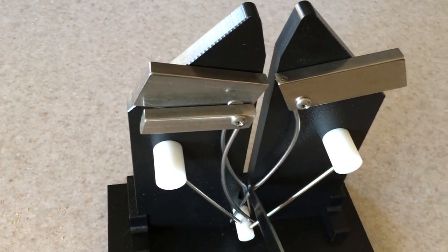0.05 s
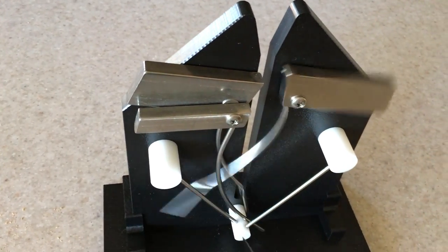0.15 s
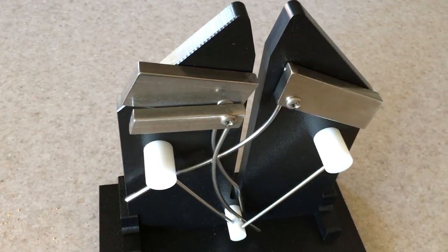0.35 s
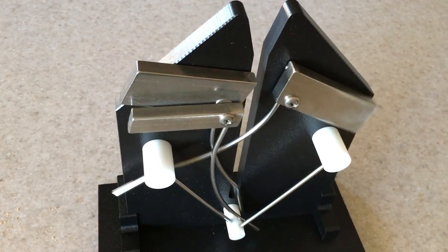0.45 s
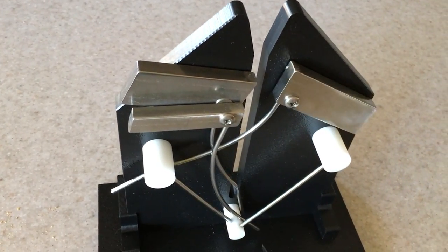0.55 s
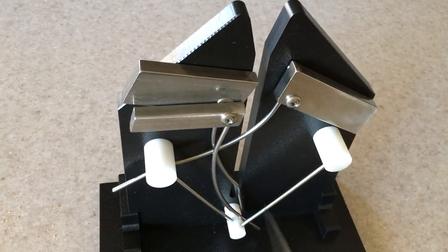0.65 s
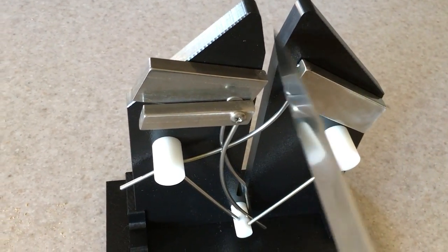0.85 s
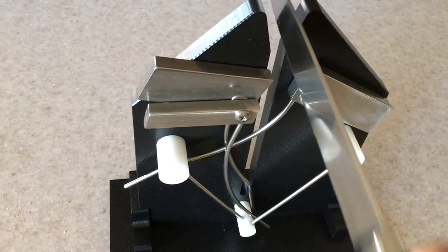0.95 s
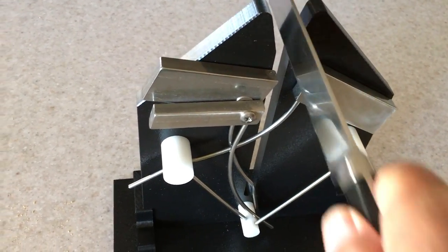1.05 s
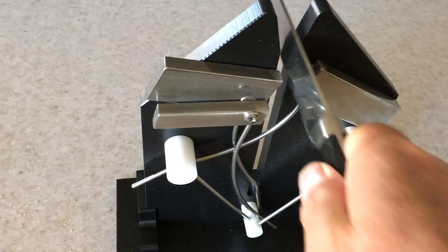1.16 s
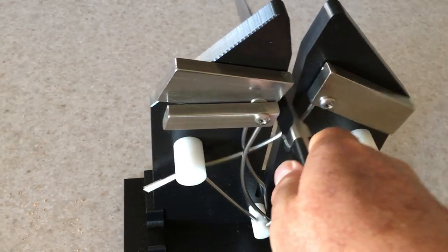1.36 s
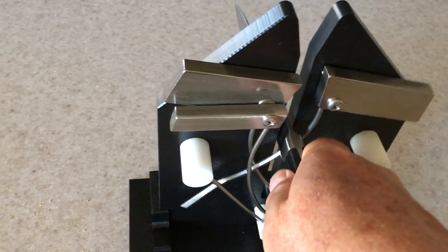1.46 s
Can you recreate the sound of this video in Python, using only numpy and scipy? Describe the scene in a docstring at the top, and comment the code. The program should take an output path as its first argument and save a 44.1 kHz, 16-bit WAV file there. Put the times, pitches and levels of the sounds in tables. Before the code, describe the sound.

Sharp metallic clacks bounce to rest on a spring-loaded knife sharpener, followed by a light clink.

```python
"""Knife in a spring-loaded sharpener

A knife scrapes out of a steel sharpener on a kitchen counter. The freed arm swings back, clacks
against its stop and bounces to rest; its wire spring rings and the plastic base thuds. Then the
blade taps in again. It is heard from close by, in a small, echoing room with a low rumble."""
import sys
import numpy as np
from scipy import signal
from scipy.fft import rfft, irfft
from scipy.io import wavfile
from scipy.ndimage import uniform_filter1d

SR = 44100
rng = np.random.default_rng(int(sys.argv[2]) if len(sys.argv) > 2 else 0)


def to_wav(s):
    """Save 16-bit WAV."""
    ch = np.atleast_2d(s).T  # columns
    pcm = np.round(np.clip(ch, -1, 1) * 32767)  # PCM
    wavfile.write(sys.argv[1], SR, pcm.astype(np.int16))


N = 66150

# each hit of the arm on its stop (time [s], level [dB], contact length [s], rise [s],
# brightness [dB per octave], base knock [dB], base thud [dB], spring ring [dB])
ARM_HITS = [(0.2037, -6, 0.0055, .0003, 2, -11.5, -12.5, -3),
            (0.2288, -19, 0.011, .001, -3, -13.5, -35, -4.5), (0.296, -0.5, 0.0039, .0002, 2, 2.5, 4, -0.5),
            (0.306, -16, 0.023, .001, 3, -2, -17.5, -23), (0.327, -14, 0.0083, .001, -2.5, -12, -16.5, -23),
            (0.339, -25, 0.0062, .001, -4, -17.5, -35.5, -29.5),
            (0.4272, -1, 0.003, .0008, 3, -2.5, -3, -0.5),
            (0.4613, -14.5, 0.0023, .0003, -0.5, -8.5, -33, -21.5),
            (0.5104, -8.5, 0.0031, .002, 1.5, -13, -9.5, 1), (0.524, -9.5, 0.0026, .002, -5, -8, -10, -4),
            (0.5761, -13, 0.0048, .0035, -3, -13, -14.5, -23),
            (0.623, -12, 0.0086, .004, -2, -13, -16.5, -20),
            (0.639, -23.5, 0.0018, .002, -7, -16.5, -16.5, -21),
            (0.659, -21, 0.018, .004, -5.5, -18, -13.5, -11),
            (0.686, -31.5, 0.034, .004, -7.5, -17, -14.5, -42)]
# tone of struck steel (frequency [Hz], level [dB])
STEEL_TONE = [(300, -23), (800, -11.5), (1500, -1), (2300, 0), (3000, -6.5), (4200, -3.5), (5600, -4.5),
              (9000, -12), (11300, -16.5), (13500, -12.5), (17500, -26)]

CRACK_DB, CRACK_T60_S = -9, 0.025  # sharp crack of steel; a "t60" is the time to fade by 60 dB
GRIT_S, GRIT_DB = 0.0028, 3.5  # fast flicker that makes a rattle rough


def undb(db):
    """Turn decibels into a gain to multiply by."""
    return 10 ** (np.asarray(db) / 20)


def unit(x):
    """Scale a signal to an average (rms) strength of 1."""
    return x / np.sqrt(np.mean(x ** 2))


def along(points, hz):
    """Read between (Hz, value) points, with octaves evenly spaced."""
    p = np.array(points)
    return np.interp(np.log(hz + 1), np.log(p[:, 0]), p[:, 1])


def noise(tone, tilt_db=0, peaks=()):
    """Noise of a given tone, tilted per octave around 3 kHz and boosted at any (Hz, dB) peaks."""
    hz = np.fft.rfftfreq(N, 1 / SR)
    octaves = np.log2(np.maximum(hz, 500) / 3000)
    boost = 1 + sum(undb(db + 4) / (1 + ((hz - peak_hz) / 38) ** 2) for peak_hz, db in peaks)
    gain = undb(along(tone, hz) + tilt_db * octaves)
    return unit(irfft(rfft(rng.standard_normal(N)) * boost * gain, N))


def resonance(hz, width):
    """A narrow band of noise around one pitch."""
    f = np.fft.rfftfreq(N, 1 / SR)
    return unit(irfft(rfft(rng.standard_normal(N)) / (1 + ((f - hz) / width) ** 2), N))


def since(start):
    """Seconds since the start, zero before it."""
    return np.maximum(np.arange(N) / SR - start, 0)


def burst(start, hold, t60, rise=0.00013):
    """Loudness shape: rise quickly, hold, fade away (all times in seconds)."""
    t = since(start)
    return (1 - np.exp(-t / rise)) * np.exp(-np.log(1000) * np.maximum(t - hold, 0) / t60)


def flutter(span, depth_db):
    """A gain that moves to a new random value every span seconds."""
    times = np.arange(0, N / SR + span, span)
    values = rng.standard_normal(N)[:len(times)]
    return unit(undb(depth_db * np.interp(np.arange(N) / SR, times, values)))


def ring(notes, start, scatter_db=0):
    """A struck object's notes swell and die away; scatter varies their strength and phase."""
    t, out = since(start), np.zeros(N)
    live = (t > 0) & (t < 1)
    t = t[live]
    rise_cycles = 2.7
    for (hz, db, t60), (size, turn) in zip(notes, rng.standard_normal((len(notes), 2))):
        shape = (1 - np.exp(-t * hz / rise_cycles)) * np.exp(-np.log(1000) * t / t60)
        wave = np.sin(2 * np.pi * hz * t + 2 * scatter_db * turn)
        out[live] += undb(db + scatter_db * size) * shape * wave
    return out


def rumble():
    """The room's steady low rumble."""
    # tone of the rumble (frequency [Hz], level [dB])
    rumble_tone = [(25, -32.5), (38, -23.5), (55, 0), (85, -19.5), (118, -12.5), (160, -19.5), (330, -27.5),
                   (1500, -40), (4000, -54), (17000, -61.5)]
    return noise(rumble_tone)


def room(x):
    """The kitchen's echoes blur into a tail that lasts longest at middle pitches."""
    # tone of the echo (frequency [Hz], level [dB])
    echo_tone = [(60, -8.5), (300, 4), (1500, 2), (4000, -9), (8000, -3), (16000, -1)]
    # how long the echo lasts (frequency [Hz], t60 [s])
    echo_t60 = [(100, 0.42), (1800, 0.79), (4000, 0.78), (16000, 0.32)]
    hz, t = np.fft.rfftfreq(N, 1 / SR), since(0.0095)
    spectrum = rfft(rng.standard_normal(N)) * undb(along(echo_tone, hz))
    bands = np.round(2 * np.log2(np.maximum(hz, 50)))  # half an octave each
    tail = np.zeros(N)
    for band in np.unique(bands):
        fade = np.exp(-np.log(1000) * t / along(echo_t60, 2 ** (band / 2)))
        tail += irfft(spectrum * (bands == band), N) * fade
    tail *= 1 - np.exp(-t / 0.00067)
    return signal.fftconvolve(x, tail / np.sqrt(np.sum(tail ** 2)))[:N]


def squeaks():
    """Steel sticks and slips on steel, making short, falling tones."""
    # the leaving blade, then the swinging arm
    # (time [s], length [s], start pitch [Hz], end pitch [Hz], level [dB])
    slips = [(.005, 0.056, 545, 522, -39.5), (0.319, 0.038, 590, 567, -24.5)]
    out = np.zeros(N)
    for start, length, from_hz, to_hz, db in slips:
        progress = np.clip(since(start) / length, 0, 1)
        hz = from_hz + (to_hz - from_hz) * progress
        wave = np.sin(2 * np.pi * np.cumsum(hz) / SR)
        out += undb(db) * np.sin(np.pi * progress) * wave * flutter(span=0.0074, depth_db=2.27)
    return out


def scrape():
    """The knife's edge drags unevenly over the steel and slips free."""
    # notes of the sliding blade (pitch [Hz], width [Hz], level [dB])
    sliding_notes = [(1380, 35, 0), (1560, 80, -4), (6900, 200, -7.5)]
    # tone of the rubbing (frequency [Hz], level [dB])
    rub_tone = [(100, -7), (450, -8.5), (2500, -18.5), (11000, -32.5), (17000, -39)]
    grip = undb(2.2 * unit(uniform_filter1d(rng.standard_normal(N), size=300)))
    singing = unit(sum(undb(db) * resonance(hz, width) for hz, width, db in sliding_notes))
    fade = np.clip((0.25 - since(0)) / 0.32, 0, 1)  # silent from 0.25 s on
    return (undb(-43.5) * singing + undb(-38.5) * noise(rub_tone)) * grip * fade


def snags():
    """The edge catches crisply on its way out, and each catch bumps the hollow plastic."""
    # catches of the edge (time [s], level [dB])
    catches = [(.154, -21), (.168, -26), (.191, -26)]
    clicks = sum(undb(db) * burst(start, hold=0, t60=0.07) for start, db in catches)
    bumps = sum(undb(db) * burst(start, hold=0, t60=0.26) for start, db in catches)
    return undb(CRACK_DB) * clicks * noise(STEEL_TONE) + undb(-10) * bumps * resonance(hz=187, width=61)


def base(start, knock_db, thud_db):
    """The plastic base knocks and rocks on the counter."""
    # tone of knocked plastic (frequency [Hz], level [dB])
    plastic_tone = [(36, -38), (70, 9.5), (130, 1), (190, -5), (290, -1), (430, -10.5), (1500, -10),
                    (4000, -32)]
    # low notes of the rocking base (pitch [Hz], level [dB], t60 [s])
    base_notes = [(70, -1, 0.33), (93.1, -5, 0.18), (125, -2.5, 0.085), (312, -24.5, 0.5)]
    knock = noise(plastic_tone) * burst(start, hold=0, t60=0.13, rise=0.00153)
    return undb(knock_db - 16) * knock + undb(thud_db - 8) * ring(base_notes, start)


def blade():
    """The blade goes back into the slot: it clinks, chatters and knocks the hollow plastic."""
    # taps of the blade (time [s], crack level [dB], base knock and thud [dB])
    taps = [(1.4421, -0.5, -16), (1.4455, -15.5, -14.5), (1.495, -7, -22)]
    # notes of the blade (pitch [Hz], level [dB], t60 [s])
    blade_notes = [(1508, -23.5, 0.1), (1750, -33, .12), (2380, -35, 0.08), (3310, -40, 0.2),
                   (5150, -40, 0.14), (6495, -33, .1), (8250, -34, 0.08), (11600, -41, 0.12),
                   (13500, -41, .14), (15420, -39, .11)]
    # note of the hollow slot (pitch [Hz], level [dB], t60 [s])
    slot_notes = [(265, -16.5, 0.065)]
    out = ring(blade_notes, start=taps[0][0]) + ring(slot_notes, start=taps[1][0])
    peaks = [(hz, 0) for hz, _, _ in blade_notes]
    for start, db, base_db in taps:
        crack = burst(start, hold=0.0034, t60=CRACK_T60_S)
        rattle = undb(-13) * burst(start, hold=0, t60=0.42)
        out += undb(db - 34.5) * (crack + rattle) * noise(STEEL_TONE, tilt_db=2, peaks=peaks)
        out += base(start, base_db, base_db)
    return out


def wire_ticks():
    """The spring wire ticks against its neighbour as it settles."""
    # light ticks (time [s], level [dB])
    ticks = [(0.542, -1), (0.5998, -8), (0.6153, 0), (0.652, -5.5), (0.676, -5.5), (1.446, 1)]
    shape = sum(undb(db - 29) * burst(start, hold=0.00037, t60=0.025) for start, db in ticks)
    return shape * resonance(hz=8480, width=380)


def spring():
    """The arm's hits shake the spring into a short, rough jingle; bright hits add a high shimmer."""
    # notes of the spring wire (pitch [Hz], level [dB], width [Hz])
    jingle_notes = [(7465, -9, 20), (8338, 0, 55), (9690, -10, 25)]
    # its highest notes (pitch [Hz], level [dB], width [Hz])
    shimmer_notes = [(12720, -3, 45), (13500, 0, 85)]
    jingle_energy, shimmer_energy = np.zeros(N), np.zeros(N)
    for start, db, _, rise, bright_db, _, _, spring_db in ARM_HITS:
        jingle_energy += (undb(spring_db) * burst(start, hold=0.024, t60=0.1, rise=0.006)) ** 2
        shimmer_energy += (undb(db + 2 * bright_db) * burst(start, hold=0, t60=0.12, rise=rise)) ** 2
    jingle = sum(undb(db) * resonance(hz, width) for hz, db, width in jingle_notes)
    shimmer = sum(undb(db) * resonance(hz, width) for hz, db, width in shimmer_notes)
    jingle *= np.sqrt(jingle_energy) * flutter(GRIT_S, GRIT_DB)
    shimmer *= np.sqrt(shimmer_energy)
    return undb(-30) * jingle + undb(-26.5) * shimmer


def arm():
    """The steel arm clacks and rattles on its stop; being loose, it rings a bit differently each time."""
    # notes of the arm (pitch [Hz], level [dB])
    arm_notes = [(1320, -7), (1500, -3.5), (1610, -3.5), (1975, -10), (2480, -1), (3360, 1), (3935, -3),
                 (4108, 4.5), (4340, 4), (5540, -5)]
    detune, ring_t60_s = 0.015, 0.1
    out = np.zeros(N)
    for start, db, contact, rise, bright_db, knock_db, thud_db, _ in ARM_HITS:
        notes = [(hz * (1 + detune * rng.standard_normal()), note_db, ring_t60_s)
                 for hz, note_db in arm_notes]
        crack = burst(start, contact, CRACK_T60_S, rise)
        rattle = undb(-7.5) * burst(start, contact, t60=0.19, rise=rise) * flutter(GRIT_S, GRIT_DB)
        out += undb(db + CRACK_DB) * (crack + rattle) * noise(STEEL_TONE, bright_db, arm_notes)
        out += undb(db - 26) * ring(notes, start + rise, scatter_db=2)
        out += base(start, knock_db, thud_db)
    return out


def scene():
    """Sharpener and knife in the room, over a quiet rumble."""
    near = scrape() + snags() + squeaks() + arm() + spring() + wire_ticks() + blade()
    return (near + undb(-15) * room(near) + undb(-48.5) * rumble())[None]


def record(dry):
    """Round off the loudest peaks and cut the treble above 17.8 kHz."""
    treble_cut = signal.ellip(8, .2, 80, 17800, fs=SR, output="sos")
    return signal.sosfilt(treble_cut, np.tanh(dry))


dry = scene()
out = record(dry)
to_wav(out)
```